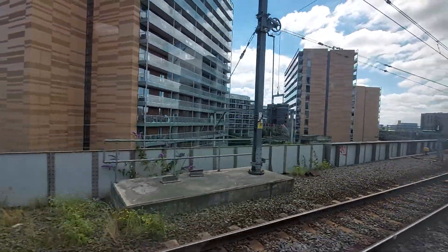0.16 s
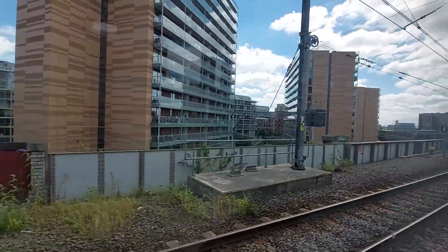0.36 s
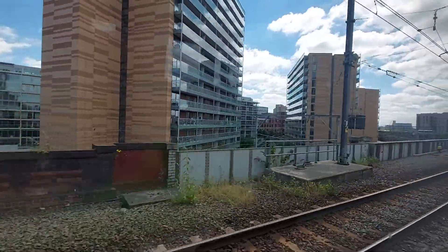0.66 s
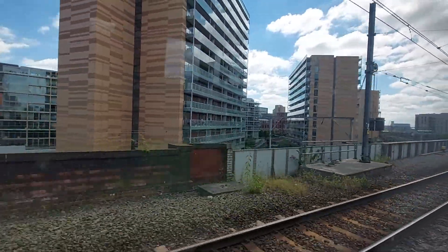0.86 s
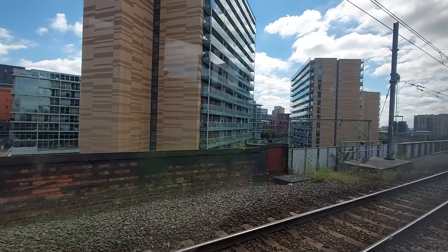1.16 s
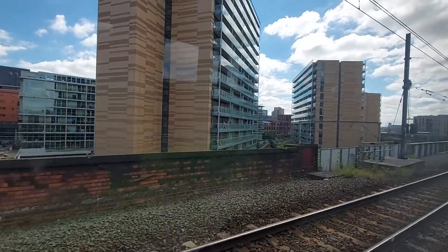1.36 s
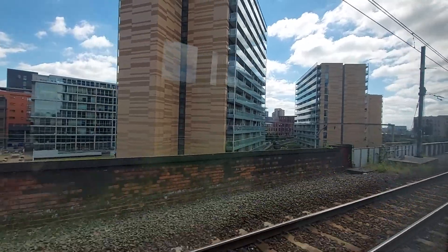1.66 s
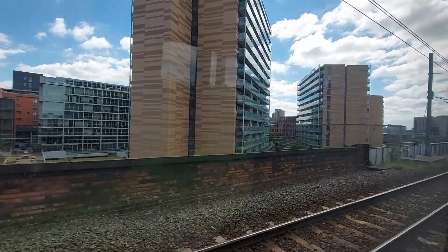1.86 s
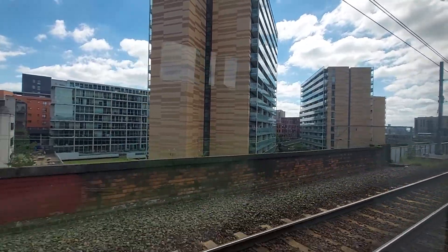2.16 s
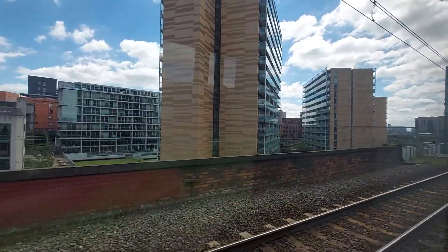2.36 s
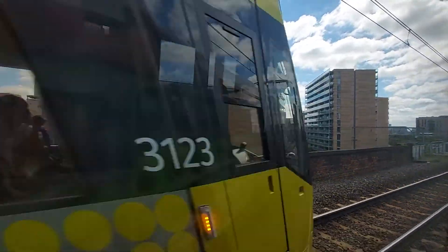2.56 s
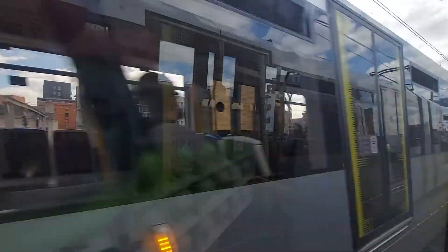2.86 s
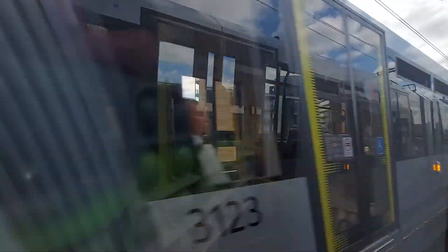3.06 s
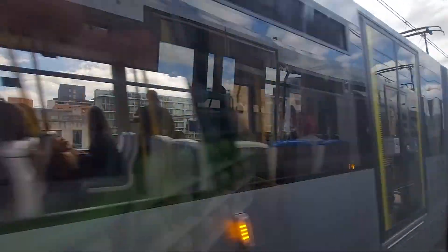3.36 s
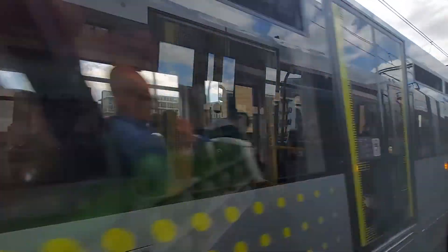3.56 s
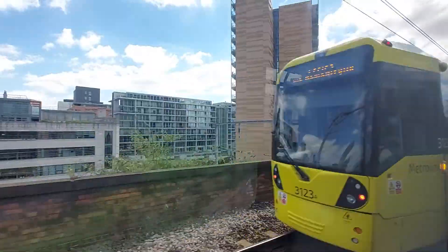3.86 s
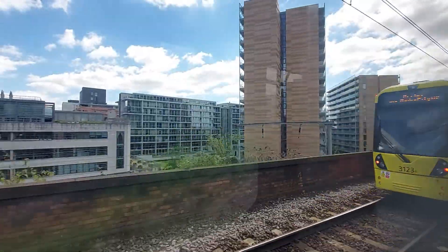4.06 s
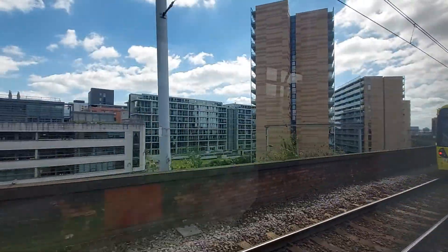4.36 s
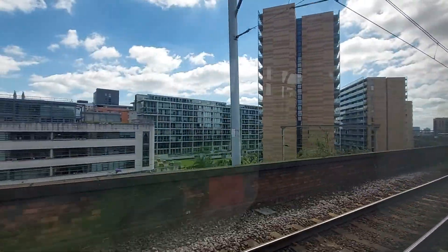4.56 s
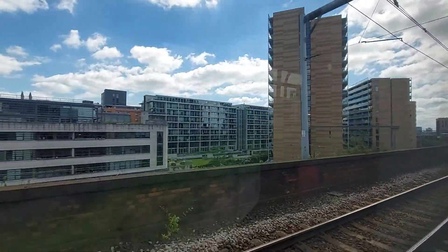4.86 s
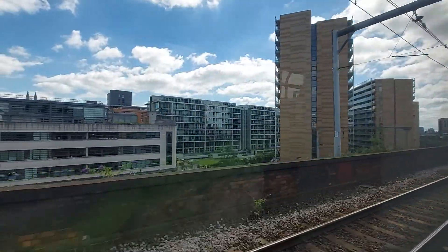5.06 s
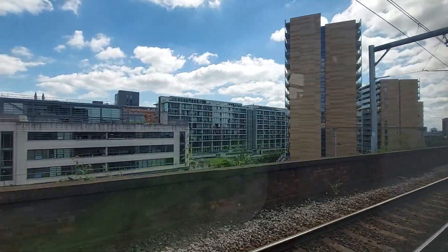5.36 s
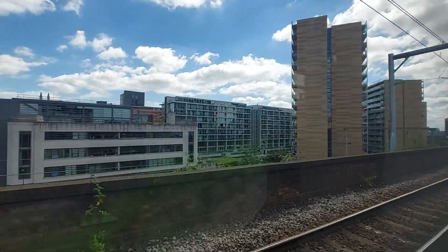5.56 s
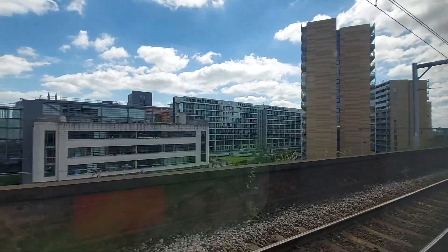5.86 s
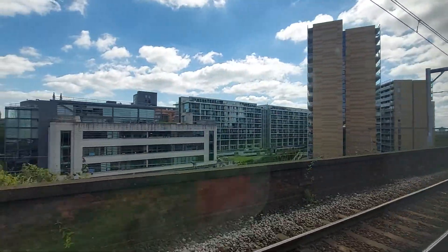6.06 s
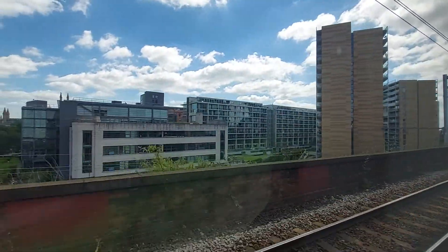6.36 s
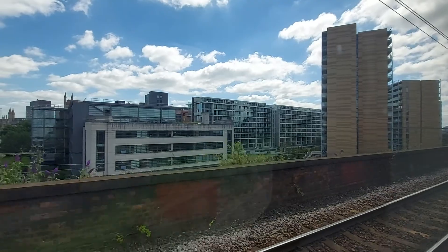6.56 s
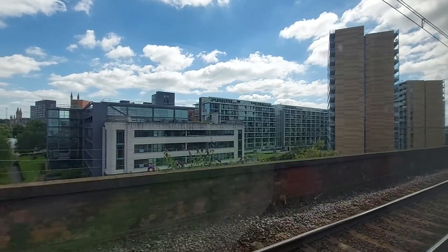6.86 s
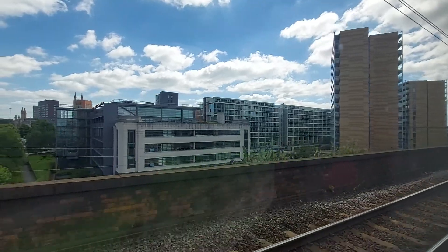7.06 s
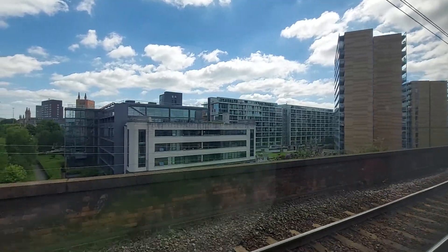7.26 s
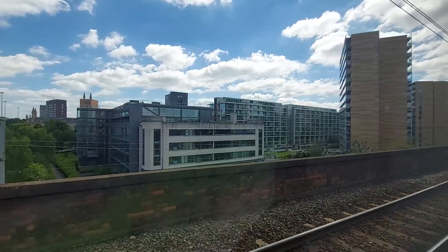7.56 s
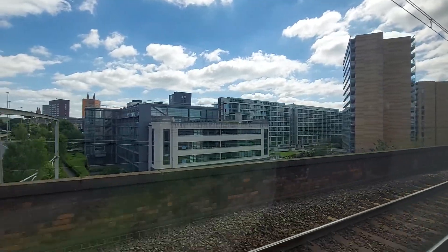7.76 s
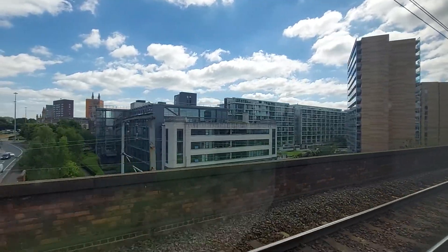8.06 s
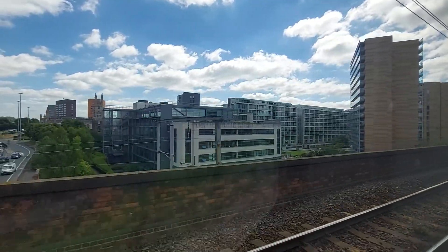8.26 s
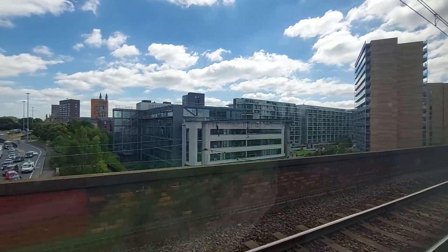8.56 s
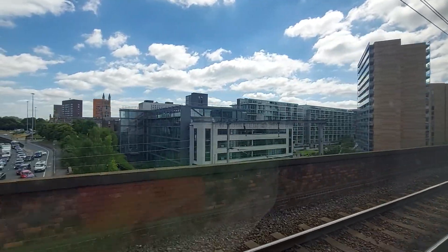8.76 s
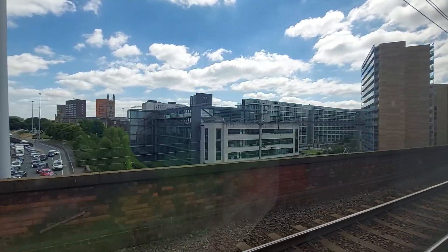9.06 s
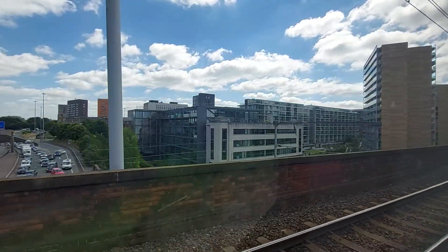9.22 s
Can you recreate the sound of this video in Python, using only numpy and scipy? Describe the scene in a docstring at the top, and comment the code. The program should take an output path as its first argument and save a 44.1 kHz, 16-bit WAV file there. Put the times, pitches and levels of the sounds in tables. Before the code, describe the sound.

Heard from inside a moving tram, wheels rumble low through the floor under rail roar, air and hiss. Loose trim ticks and rubbing parts give faint, high squeaks. About three seconds in, another tram rushes past the window with one sharp knock. The track then turns rougher, adding a throbbing drone, dull taps and occasional thuds from the running gear, while the motors whine faintly.

```python
"""A low wheel rumble through the floor of a moving tram, under rail roar, air and hiss.
Another tram rushes past the window with one sharp knock. Halfway the track turns rougher:
the car body resonates higher up and rail ripples add a throbbing drone.
Drive and wheels sing faintly, the running gear jolts, loose trim ticks, fittings tap,
and rubbing parts give short, mostly high squeaks."""
import sys
import numpy as np
from scipy import signal
from scipy.fft import rfft, irfft, next_fast_len
from scipy.io import wavfile
from scipy.ndimage import uniform_filter1d, map_coordinates

SR = 44100
rng = np.random.default_rng(int(sys.argv[2]) if len(sys.argv) > 2 else 0)


def pcm_store(signal):
    """Save signal as 16-bit PCM."""
    levels = np.round(np.clip(np.atleast_2d(signal), -1, 1) * 32767)
    wavfile.write(sys.argv[1], SR, levels.astype(np.int16).T)


N = 414082

# change to rough track: time_s, rough_share
TRACK_ROUGHNESS = [(4.15, 0.01), (4.5, 1)]
# wheels on rails: time_s, roar_db, hiss_db
RAIL_LEVELS = [(0, -40, -58), (.45, -41, -57), (.9, -38, -56), (2.0, -41, -58), (4.1, -40.5, -56),
               (4.8, -39, -53), (5.1, -39, -53), (5.55, -39.5, -50), (5.8, -41.5, -53), (6.15, -39, -54.5),
               (6.55, -41.5, -56.5), (7.05, -36, -53.5), (7.5, -42, -59), (7.9, -37.5, -49.5),
               (8.15, -39.5, -55.5), (8.65, -37.5, -50), (9.0, -40.5, -54.5), (9.39, -41, -54.5)]
# rail roar: freq_hz, gain_db
ROAR_SPECTRUM = [(300, -25), (420, -0.5), (525, 2), (600, -1.5), (690, -3), (760, 0), (800, -1.5),
                 (915, -1.5), (980, -10), (1300, -14), (1700, -22), (2600, -30.5), (5000, -54.5)]


def amp(db):
    """Decibels to gain."""
    return 10 ** (np.asarray(db) / 20)


def unit(x):
    """Scale to rms 1."""
    return x / np.sqrt(np.mean(x ** 2) + 1e-20)


def along(points, hz):
    """Interpolate (freq_hz, value) points on a log axis."""
    freq_hz, values = np.transpose(points)
    return np.interp(np.log(hz + 1), np.log(freq_hz + 1), values)


def colour(points):
    """Gain against frequency, falling steeply past the last point."""
    return lambda hz: amp(along(points, hz)) / (1 + (hz / (2 * points[-1][0])) ** 4)


def clock():
    """Sample times in seconds."""
    return np.arange(N) / SR


def curves(rows):
    """One value per sample for each column after the time."""
    time_s, *columns = np.transpose(rows)
    return [np.interp(clock(), time_s, column) for column in columns]


def wobble(rate_hz):
    """Smooth random curve, rate_hz knots a second."""
    knots = rng.standard_normal(int(N * rate_hz / SR) + 4)
    return map_coordinates(knots, [np.arange(N) * rate_hz / SR])


def filtered(x, response):
    """Apply a frequency response."""
    size = x.shape[-1]
    padded = next_fast_len(size + 8192)
    return irfft(rfft(x, padded) * response(np.fft.rfftfreq(padded, 1 / SR)), padded)[..., :size]


def noise(gain, size=N):
    """Stereo noise, mid at rms 1: alike in the bass, unrelated in the treble."""
    # left-right likeness: freq_hz, correlation
    likeness = [(60, 1), (160, 0.97), (250, 1), (330, 0.77), (450, 0.79), (740, 0.77), (1200, 0.087),
                (2500, 0)]

    def response(hz):
        angle = np.arccos(np.clip(along(likeness, hz), -1, 1)) / 2
        return gain(hz) * np.array([np.cos(angle), np.sin(angle)])
    mid, side = filtered(rng.standard_normal((2, size)), response)
    return np.array([mid + side, mid - side]) / np.std(mid)


def steady(x, span_s):
    """Even out swells slower than span_s."""
    power = uniform_filter1d(x.mean(0) ** 2, max(int(span_s * SR), 2))
    return x / np.sqrt(np.abs(power) + 1e-6)


def add(out, start_s, sound):
    """Mix a sound in at start_s."""
    part = out[:, max(round(start_s * SR), 0):][:, :sound.shape[-1]]
    part += sound[..., :part.shape[1]]


def rough_share():
    """Share of rough track under the wheels, 0-1."""
    return np.clip(curves(TRACK_ROUGHNESS)[0], 0, 1)


def passing(closest_s=3.145, width_s=0.43):
    """Gain of the other tram: 1 alongside, falling with distance."""
    return 1 / (1 + ((clock() - closest_s) / width_s) ** 2) ** 0.62


def cabin(x, t60_s=0.091, wet_db=-6):
    """Close reflections add a fine comb of cabin modes."""
    t = np.arange(SR // 6) / SR
    tail = rng.standard_normal((2, len(t))) * amp(-60 * t / t60_s)
    tail /= np.linalg.norm(tail[0])
    tail = filtered(tail, lambda hz: hz ** 2 / (hz ** 2 + 700 ** 2))  # panels soak up the bass
    wet = signal.fftconvolve(x, tail, axes=1)[:, :N]
    return (x + amp(wet_db) * wet) / np.hypot(1, amp(wet_db))


def whine(fade_s=0.14):
    """Narrow, wavering tones of motors, wheels and rails fade in and out."""
    # tones: centre_hz, level_db, half_width_hz, start_s, end_s
    tones = [(322, -37.5, 3, -1, 10), (268, -41, 3, 2.2, 4.3), (880, -48, 55, -1, 4),
             (1604, -56, 6, -1, 4.6), (1970, -54, 40, -1, 4.2), (3644, -65, 55, -1, 4.2),
             (1620, -56, 160, -1, 10), (345, -35, 20, 4.7, 5.5), (469, -47, 7, 4.5, 10),
             (1044, -55, 8, 8.05, 10), (208, -34, 3, 6.6, 8.8)]
    out, t = np.zeros((2, N)), clock()
    for centre_hz, level_db, half_width_hz, start_s, end_s in tones:
        fade = np.clip(np.minimum(t - start_s, end_s - t) / fade_s + .5, 0, 1)
        band = noise(lambda hz: 1 / (1 + ((hz - centre_hz) / half_width_hz) ** 2))
        out += amp(level_db) * fade * steady(band, span_s=0.48)
    return out


def squeaks(rise_s=0.024, t60_s=0.33, grain_db=1.0):
    """A short, uneven rub excites two rough resonances an octave apart, which ring out."""
    # rubs: start_s, length_s, level_db, pitch_hz, spread_oct, lower_mode_db
    rubs = [(.29, .05, -61.5, 14600, .08, -22), (0.81, 0.042, -43, 13540, 0.35, -9),
            (1.162, 0.052, -36, 12320, 0.087, -2), (1.616, 0.071, -44.5, 13400, 0.14, -17),
            (1.767, 0.067, -38, 12830, 0.2, -13), (2.809, 0.027, -47.5, 11500, .14, -20),
            (3.054, 0.051, -44.5, 12460, 0.095, 2.5), (3.35, .1, -56, 12360, .15, -13),
            (3.778, 0.057, -56.5, 11300, .15, -13), (4.755, 0.048, -57.5, 12860, .16, -16),
            (4.855, 0.026, -45, 1490, 0.089, -2.5), (5.93, 0.15, -50, 1185, .12, -22),
            (6.265, 0.13, -53.5, 2500, 0.16, -19), (7.09, 0.078, -59, 10800, 0.024, -21),
            (8.614, 0.074, -59.5, 12950, 0.13, 6.5)]
    # resonance skirts: offset_spreads, gain_db
    skirts = [(-6, -45), (-2.5, -21), (-.8, -8), (0, 0), (1, -6), (3, -14), (9, -25), (18, -50)]
    # clean ringing: freq_hz, level_db
    squeal = [(6158, -42), (6315, -57), (6540, -50), (12185, -47), (12396, -48)]
    out, t = np.zeros((2, N)), np.arange(SR // 2) / SR
    strongest_db = max(rub[2] for rub in rubs)

    def mode(centre_hz, spread_oct):
        offset = lambda hz: np.log2((hz + 1) / centre_hz) / spread_oct
        return noise(lambda hz: amp(np.interp(offset(hz), *np.transpose(skirts))), size=len(t))
    for start_s, length_s, level_db, pitch_hz, spread_oct, lower_mode_db in rubs:
        stroke = np.minimum(t / rise_s, 1) * amp(-60 * np.maximum(t - length_s, 0) / t60_s)
        slips = unit(uniform_filter1d(rng.standard_normal(len(t)), SR // 250))
        modes = mode(pitch_hz, spread_oct) + amp(lower_mode_db) * mode(pitch_hz / 2, spread_oct / 2)
        sound = amp(level_db + grain_db * slips) * modes
        if level_db == strongest_db:  # only the hardest rub locks into clean ringing
            sound += sum(amp(db) * np.sin(2 * np.pi * (hz * t + rng.random((2, 1)))) for hz, db in squeal)
        add(out, start_s, stroke * sound)
    return out


def ticks(rise_s=.0012, crack_t60_s=0.026, cabin_t60_s=0.26, cabin_db=-13):
    """Loose trim snaps against its frame; the cabin answers briefly."""
    # snaps: start_s, level_db, body_db, top_db
    snaps = [(0.7497, -41, 4, -10), (0.9707, -32, 1, -13), (1.5075, -29, 4, -18), (1.7844, -33, 0, -9),
             (1.8514, -32, -1, -11), (2.4099, -28, -2, -15), (3.2685, -28, -2, -15), (3.4905, -32, 3, -14),
             (4.4817, -29, 2, -15), (4.6174, -34, 0, -10), (4.9501, -33, 2, -17), (4.998, -39, 3, -16),
             (5.5388, -35, 3, -16), (6.0871, -37, 2, -14), (6.4044, -37, 0, -14), (6.4383, -38, 2, -12),
             (7.1546, -33, 0, -16), (7.2689, -38, 2, -13), (8.9261, -32, 0, -13), (9.2569, -33, -1, -14),
             (9.3157, -38, 2, -12)]
    # hollow body, crack and bright top: freq_hz, gain_db
    body = [(400, -20), (720, 0), (1100, 1), (1400, -4), (1900, -1), (2600, -9), (4000, -35)]
    crack = [(1600, -16.5), (2700, 6), (4000, 2), (5200, -5), (6700, 0.5), (8200, -4.5), (9500, -20),
             (15000, -30)]
    top = [(8500, -32), (10000, -11.5), (11500, 3), (13500, -6), (15800, -7)]
    out, t = np.zeros((2, N)), np.arange(SR // 4) / SR
    decay = np.hypot(amp(-60 * t / crack_t60_s), amp(cabin_db - 60 * t / cabin_t60_s))
    envelope = (1 - np.exp(-t / rise_s)) * decay
    band = lambda spectrum, db: amp(db) * steady(noise(colour(spectrum), size=len(t)), span_s=0.0027)
    for start_s, level_db, body_db, top_db in snaps:
        snap = band(body, body_db + 3) + band(crack, -4) + band(top, top_db + 5.5)
        add(out, start_s, amp(level_db) * envelope * snap)
    return out


def taps(rise_s=.001, t60_s=0.091, overtone_db=-10, gain_db=-4.5):
    """Loose fittings under the floor give dull taps of two modes each."""
    # taps: start_s, level_db, pitch_hz
    hits = [(4.461, -29, 867), (4.716, -28, 612), (4.804, -21.5, 504), (4.875, -23, 584),
            (5.394, -26.5, 640), (6.079, -26, 532), (7.774, -24.5, 573), (8.315, -22, 759),
            (8.475, -30, 580)]
    out, t = np.zeros((2, N)), np.arange(SR // 5) / SR
    envelope = (1 - np.exp(-t / rise_s)) * amp(-60 * t / t60_s)
    for start_s, level_db, pitch_hz in hits:
        phase = 2 * np.pi * pitch_hz * t
        ring = np.sin(phase) + amp(overtone_db) * np.sin(1.37 * phase)
        add(out, start_s, amp(level_db + gain_db) * envelope * ring)
    return out


def jolts(rise_s=0.0049, t60_s=0.15):
    """Jolts of the running gear thud through the suspension."""
    # thuds: start_s, level_db, pitch_hz
    thuds = [(.84, -11, 235), (3.035, -8, 84), (3.283, -10.5, 97), (4.809, -12.5, 290.9), (4.861, -17, 377),
             (5.248, -17, 293), (8.465, -3, 200)]
    out, t = np.zeros((2, N)), np.arange(SR // 3) / SR
    envelope = (1 - np.exp(-t / rise_s)) * amp(-60 * t / t60_s)
    for start_s, level_db, pitch_hz in thuds:
        add(out, start_s, amp(level_db) * envelope * np.sin(2 * np.pi * pitch_hz * t))
    return out


def knock(start_s=3.0545, level_db=-8, rise_s=.0013, echo_db=-27, echo_t60_s=.22):
    """One hard blow rings a panel, with a faint echo."""
    # panel modes: freq_hz, level_db, t60_s
    modes = [(522, 0, .045), (748, -12, .045), (1244, -21, .04), (1986, -26, .03)]
    out, t = np.zeros((2, N)), np.arange(SR // 3) / SR
    ring = sum(amp(db - 60 * t / t60_s) * np.sin(2 * np.pi * hz * t) for hz, db, t60_s in modes)
    echo = amp(echo_db - 60 * t / echo_t60_s) * noise(colour(ROAR_SPECTRUM), size=len(t))
    add(out, start_s, amp(level_db) * (1 - np.exp(-t / rise_s)) * (ring + echo))
    return out


def rush(air_smooth_db=-47.5, air_rough_db=-51.5, air_fade_s=1.5):
    """Rail roar, moving air and hiss come through the windows and swell as the other tram passes."""
    # moving air and rail hiss: freq_hz, gain_db
    air_spectrum = [(700, -17.5), (1100, 0.5), (1340, -7.5), (1490, 0.5), (1620, -1), (1800, 1.5),
                    (1970, -0.5), (2130, -3.5), (2500, -8), (2900, -13.5), (3250, -23), (3620, -9.5),
                    (4400, -27), (9000, -36.5)]
    hiss_spectrum = [(1200, -13.5), (2500, 1), (3200, 2.5), (3800, 0), (4700, -3.5), (5600, -6), (6500, -3),
                     (8000, -11), (9200, -25), (10200, -17.5), (11500, -9.5), (13000, -16), (15800, -18.5)]
    roar_db, hiss_db = curves(RAIL_LEVELS)
    change_s = TRACK_ROUGHNESS[0][0]
    air_db = np.interp(clock(), [change_s, change_s + air_fade_s], [air_smooth_db, air_rough_db])

    def both_trams(own_db, other_db, falloff=1):
        return np.hypot(amp(own_db), amp(other_db) * passing() ** falloff)
    judder = wobble(28)  # rail unevenness, shared by roar and hiss
    roar = both_trams(roar_db, other_db=-34) * amp(1.87 * judder) * noise(colour(ROAR_SPECTRUM))
    air = both_trams(air_db, other_db=-42.5) * amp(0.59 * wobble(9)) * noise(colour(air_spectrum))
    hiss_gain = both_trams(hiss_db, other_db=-46, falloff=1.23) * amp(.5 * judder + wobble(60))
    return roar + air + hiss_gain * noise(colour(hiss_spectrum))


def drone(throb_db=4.5, throb_rate_hz=18, wander_hz=6, wander_rate_hz=8):
    """Ripples in the rail head pass under the wheels and make a low, throbbing note."""
    # ripple depth: time_s, level_db
    ripple_levels = [(4.2, -26), (4.5, -16.5), (4.75, -14.5), (4.98, -25.5), (5.17, -18.5), (5.55, -22),
                     (5.95, -21.5), (6.15, -16.5), (6.5, -22), (6.85, -20), (7.2, -19), (7.55, -30.5),
                     (7.8, -19), (8.1, -22), (8.7, -17.5), (9.05, -29), (9.39, -19.5)]
    # note set by ripple spacing: time_s, pitch_hz
    ripple_pitches = [(4.3, 128), (4.8, 124), (5.7, 129), (6.2, 134), (7.1, 142), (7.7, 127), (8.35, 140),
                      (8.7, 124), (9.39, 140)]
    level_db, = curves(ripple_levels)
    pitch_hz, = curves(ripple_pitches)
    phase = 2 * np.pi * np.cumsum(pitch_hz + wander_hz * wobble(wander_rate_hz)) / SR
    note = amp(throb_db * wobble(throb_rate_hz)) * np.sin(phase)
    return rough_share() * amp(level_db) * steady(note[None], span_s=.35)


def rumble(body_smooth_db=-25, body_rough_db=-19, body_pass_db=-27, boom_lift_db=3, lumps_db=1.0):
    """Rail roughness shakes the floor; rougher track drives the body's resonances higher up."""
    # floor boom and car body on each kind of track: freq_hz, gain_db
    smooth_boom = [(15, -26.5), (28, -19), (40, -19.5), (52, -5.5), (62, 3), (75, -6.5), (92, -2),
                   (110, -5), (150, -44)]
    rough_boom = [(15, -35), (28, -21), (42, -13), (60, -3.5), (78, 3), (92, 1), (110, -13.5), (150, -46)]
    smooth_body = [(70, -42), (97, -0.5), (112, 1), (130, -3.5), (170, -2.5), (205, -9), (240, -10),
                   (270, -10), (295, -11.5), (335, -10.5), (400, -16.5), (520, -39), (800, -72)]
    rough_body = [(72, -29), (94, 1.5), (118, -0.5), (140, -3), (165, 1.5), (195, -6), (210, -0.5),
                  (232, -7), (250, -8), (272, -6), (302, -11), (335, -13), (362, -15), (398, -21.5),
                  (425, -25.5), (800, -56)]
    # floor shaking: time_s, boom_db
    floor_levels = [(0, -33), (1.6, -25), (2.8, -27.5), (3.15, -23), (3.65, -25.5), (3.9, -29), (4.5, -31),
                    (5.05, -39), (5.45, -29.5), (6.0, -34.5), (7.3, -36.5), (7.6, -31.5), (8.6, -35.5),
                    (9.39, -34.5)]
    boom_db, = curves(floor_levels)
    roar_db, _ = curves(RAIL_LEVELS)
    smooth, rough = np.sqrt(1 - rough_share()), np.sqrt(rough_share())
    shaking = lambda spectrum: steady(noise(colour(spectrum)), span_s=.25)
    boom = smooth * shaking(smooth_boom) + rough * amp(boom_lift_db) * shaking(rough_boom)
    smooth_gain = np.hypot(amp(body_smooth_db), amp(body_pass_db) * passing())
    body = smooth * smooth_gain * shaking(smooth_body) + rough * amp(body_rough_db) * shaking(rough_body)
    swell_db = .5 * (roar_db - roar_db.mean()) + lumps_db * wobble(14)  # body follows the rail roar
    return amp(boom_db) * boom + amp(swell_db) * body


def scene():
    """Everything heard in the cabin."""
    return rumble() + drone() + cabin(rush()) + whine() + ticks() + squeaks() + knock() + jolts() + taps()


def record(dry, top_hz=15830):
    """Colour left and right differently; cut everything above top_hz."""
    # stereo balance: freq_hz, left_minus_right_db
    balance = [(200, 0), (330, 2), (520, -3.5), (780, 3.5), (1150, 6), (1800, 8), (2700, 2), (4200, -1.5),
               (6500, 3.5), (8300, -9.5), (9300, -5.5), (11000, 11), (13000, 4.5), (15500, -3.5)]

    def response(hz):
        pair = amp(np.outer([.5, -.5], along(balance, hz)))
        return pair / np.sqrt(np.mean(pair ** 2, axis=0)) * (hz < top_hz)
    return filtered(dry, response)


dry = scene()
out = record(dry)
pcm_store(out)
```